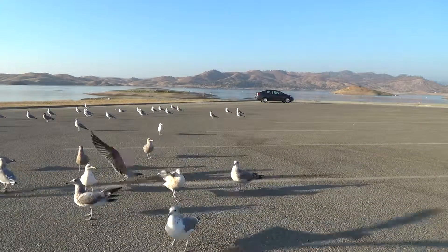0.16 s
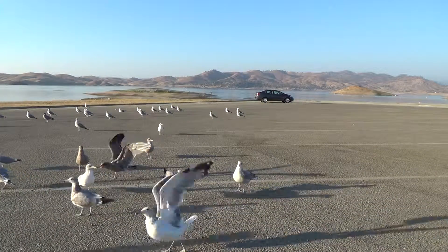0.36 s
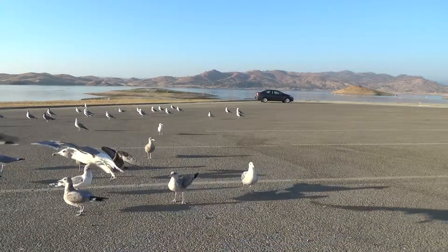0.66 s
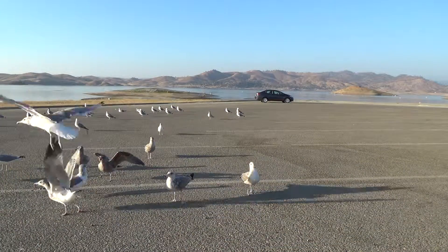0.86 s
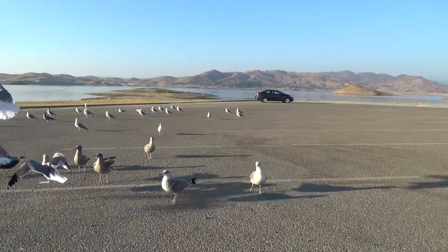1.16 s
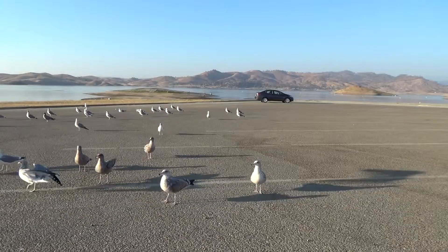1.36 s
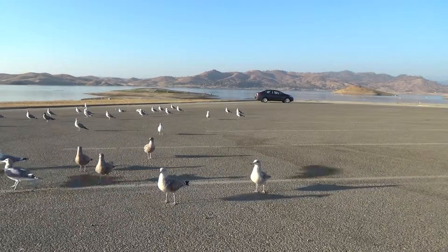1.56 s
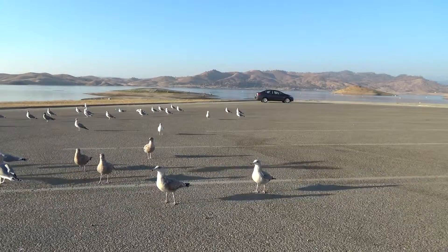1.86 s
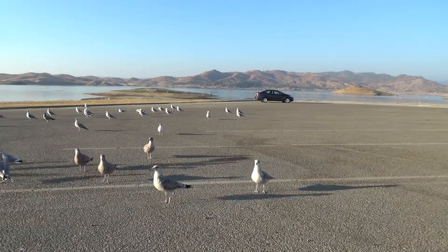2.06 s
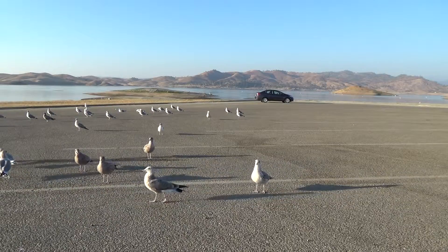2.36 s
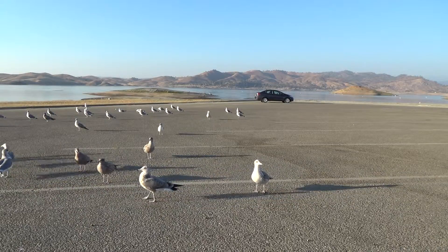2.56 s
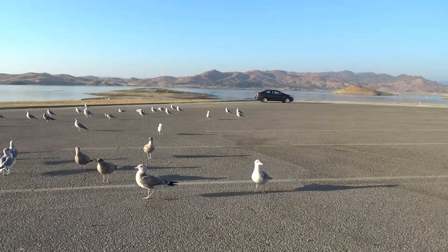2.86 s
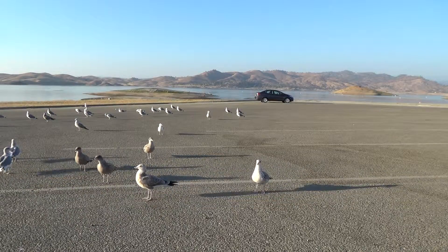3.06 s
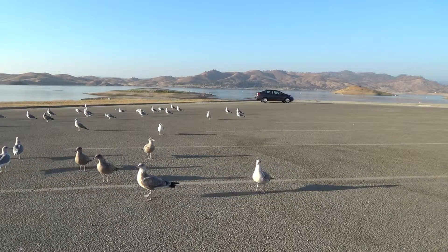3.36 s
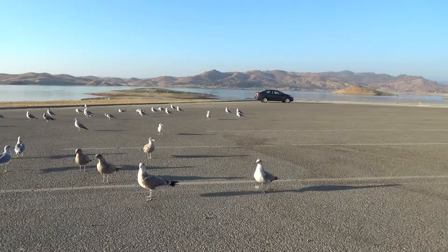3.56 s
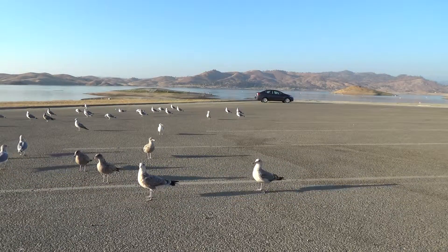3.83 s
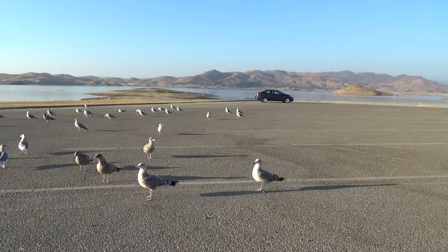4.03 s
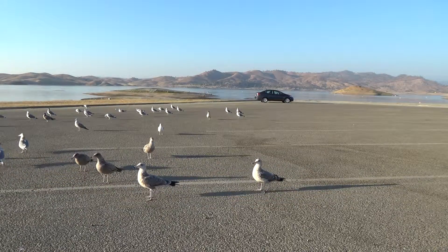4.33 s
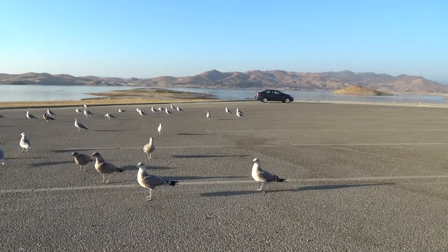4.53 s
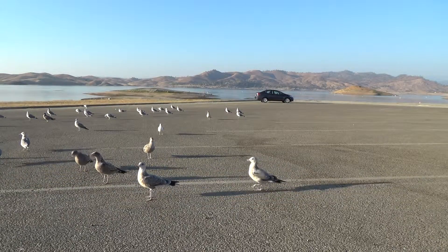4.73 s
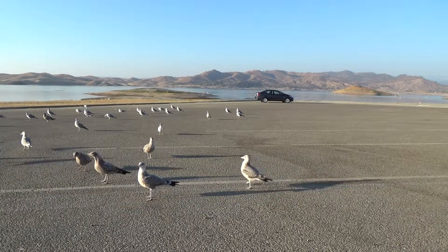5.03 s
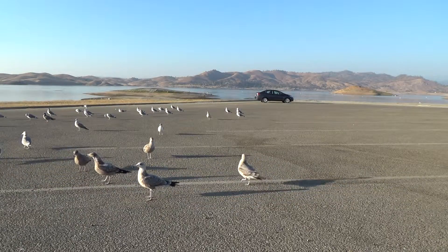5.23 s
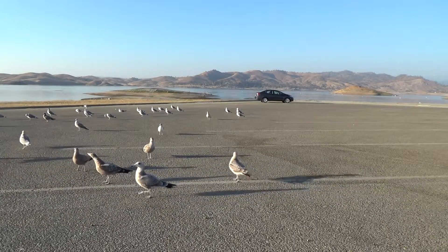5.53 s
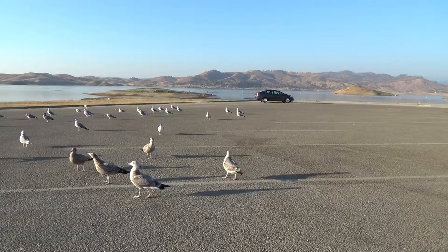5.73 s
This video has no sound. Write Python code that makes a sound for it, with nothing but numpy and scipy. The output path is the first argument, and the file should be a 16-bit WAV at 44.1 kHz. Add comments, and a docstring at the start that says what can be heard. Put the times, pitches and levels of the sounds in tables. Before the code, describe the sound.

Quiet outdoor air, a very thin high whine and the light rustle of a gull flock on asphalt run throughout. At about 0.3 s a nearby gull, slightly left, cries out: a raspy start, then shrill clashing whistles around 3 to 4 kHz, sinking and cracking into a throbbing rattle from 0.9 to 1.3 s. A lull follows, with tiny ticks and scuffs. The second cry starts near 2.2 s, rough and whistling, becomes a loud, harsh rattle from 2.5 to 3.2 s, then thins into wavering whistles until 3.9 s. A firm low thump lands at 3.5 s. The third cry begins around 4.2 s, weaker and squealing; scuffs cluster at 4.55 to 5.1 s while a second gull gives a brief falling yelp at 4.7 s. A fading, pulsing rattle runs from 5.2 to 5.8 s. Open, nearly echo-free stereo, with only a faint smear from the ground.

```python
"""Quiet outdoor air with a thin whine, the rustle of a flock on asphalt and short thumps and scuffs run throughout.
Gulls give three long cries, from about 0.3, 2.2 and 4.2 s; a second gull yelps at 4.7 s, falling in pitch.
Two membranes of the syrinx whistle at different pitches, and their shared air stream adds mixing tones.
Each cry breaks into a rattle: a train of pulses, often throbbing, each of which rings the throat.
The ground returns a faint smear, and the summed sound is softly limited and loses its top."""
import sys
import numpy as np
from scipy import signal
from scipy.fft import rfft, irfft, next_fast_len
from scipy.io import wavfile
from scipy.ndimage import uniform_filter1d

SR = 44100
rng = np.random.default_rng(int(sys.argv[2]) if len(sys.argv) > 2 else 0)


def file_out(sig):
    """Save sig as 16-bit WAV at sys.argv[1]."""
    # one column per channel
    cols = np.atleast_2d(sig).T
    # limit, then scale
    lim = np.clip(cols, -1, 1)
    pcm = np.round(lim * 32767).astype(np.int16)
    wavfile.write(sys.argv[1], SR, pcm)


N = 259749
TIME = np.arange(N) / SR  # seconds

# Spectrum of the open air. Each row: frequency in Hz, relative level in dB.
AIR_COLOUR = [(18, -68.5), (30, -25.5), (84, -7.5), (226, -2), (453, -4), (529, -6), (618, -7),
              (2770, -14.5), (3320, -18), (12400, -19), (14500, -28.5)]
# rms levels in dB, before the final limiting and filtering
AIR_DB, WHINE_DB = -55, -69.5
WHINE_HZ = 15734

# Course of the flock's rustle. Each row: time in seconds, level in dB before a common offset.
RUSTLE_LEVEL = [(0, -47), (.3, -52), (1.35, -51), (1.63, -61), (2.12, -63), (3.5, -43.5), (4.1, -50),
                (4.6, -41), (5.89, -47)]
# Spectrum of the rustle. Each row: frequency in Hz, relative level in dB.
RUSTLE_COLOUR = [(180, -40), (300, -10.5), (685, -4), (892, -6), (1110, -5), (2520, -15), (10100, -7),
                 (15500, -18)]

# Thumps and scuffs on the ground. Each row: start in seconds, level in dB, centre frequency in Hz,
# width in octaves, rise in seconds, decay in seconds.
SCUFFS = [(.262, -42.5, 930, 0.84, 0.0011, 0.018), (1.357, -34, 5900, 1.25, .0005, 0.0018),
          (1.443, -41, 9100, 0.79, 0.00059, 0.0034), (1.495, -52.5, 1300, 1.1, .01, 0.012),
          (1.921, -51.5, 4000, 4, .006, 0.037), (2.593, -29, 1000, 1.6, 0.0014, 0.023),
          (2.96, -37, 606, 0.72, 0.025, 0.045), (3.472, -35, 2786, 1.64, 0.00078, 0.011),
          (3.527, -26, 2200, 1.9, 0.00094, 0.0077), (3.53, -20.5, 510, 1.5, 0.0025, 0.022),
          (4.157, -37, 1403, 1, 0.0042, 0.028), (4.553, -26, 2150, 1.53, 0.0032, 0.019),
          (4.559, -29, 791, 1.67, 0.0065, 0.047), (4.655, -30.5, 1034, 0.5, .02, 0.033),
          (4.846, -31, 1505, 0.87, 0.0052, 0.022), (5.079, -32, 1499, 0.86, 0.011, .025)]

# Rattles, as trains of pulses. Each row: start and end in seconds, attack and release in seconds,
# first and last level in dB, first and last pulse rate in Hz, run-down share of the rate (0-1),
# first and last throat resonance in Hz, mid-way resonance rise in Hz, first and last ring in dB,
# throb period in seconds, throb depth in dB.
RATTLES = [ (.328, .362, .018, .006, -25, -21, 376, 390, 0, 3360, 3400, 0, -2, -3, .05, 0),
           (.384, .43, .02, .012, -27, -26, 440, 390, 0, 3700, 3550, 0, 8, 8, .05, 0),
           (.911, 1.321, .004, .014, -26, -22.5, 285, 212, .5, 2650, 2450, 0, 11.5, 8.5, .0502, 19),
           (2.152, 2.42, .045, .19, -25.5, -23, 248, 310, 0, 3400, 2950, 500, -12, 38, .05, 0),
           (2.529, 3.18, .012, .045, -18, -20, 298, 222, .2, 3620, 3100, -130, 8, -1, .048, 3),
           (3.91, 3.96, .01, .04, -24, -27, 210, 150, .1, 2414, 1760, 0, 27, 24, .05, 0),
           (5.222, 5.83, .03, .035, -25, -29.5, 308, 180, .04, 3440, 2940, 440, 17, 2, .0495, 5.5), ]
# Throat transmission while rattling, in three postures. Each row: frequency in Hz, relative level in dB.
THROAT_A = [(150, -33), (260, -19.5), (850, -22.5), (1200, -33.5), (1700, -8), (2650, -3), (3300, -1.5),
            (3900, -19.5), (5000, -5.5), (6400, -23), (7500, -16.5), (8700, -26.5), (10400, -12.5),
            (15000, -42)]
THROAT_B = [(150, -37.5), (260, -13.5), (1150, -15.5), (1600, -13), (2100, 2.5), (2800, 7.5), (3850, 6),
            (4700, -19.5), (5500, -11), (6700, -4.5), (7900, -20.5), (9700, -2.5), (11300, -19.5),
            (15500, -55)]
THROAT_C = [(150, -35), (260, -8), (1000, -9.5), (1600, -8), (2200, -0.5), (3000, 1), (3700, 4),
            (4500, -19.5), (5600, -12), (6500, -8), (7800, -20), (9600, -11), (11000, -16.5), (15500, -60)]
# The bill just opening, with a resonance near 1.3 kHz. Each row: frequency in Hz, relative level in dB.
THROAT_OPENING = [(150, -34), (260, -15.5), (1000, -16), (1300, -7.5), (1700, -16.5), (2200, -8),
                  (2800, 1.5), (3750, 5), (4800, -24), (6200, -14.5), (8000, -31.5), (10000, -12),
                  (15000, -44)]
# the pulses run down as the breath gives out; a wider gape raises throat resonance and level together
RUN_DOWN_S, GAPE_DB_PER_HZ = .03, .012
# over one throb the pulses quicken and the throat rises by these shares; throbbing dies away late
THROB_QUICKENS, THROB_LIFTS, THROB_DYING_POWER = .12, .13, 6

# Notes of the lower membrane. Each row: start and end in seconds, first and last pitch in Hz,
# first and last level in dB, octave level in dB, treble in dB relative to the note, roughness (0-1).
LOW_NOTES = [ (.334, .357, 3480, 3480, -38, -26, -29, 3, .7),
             (.357, .412, 3290, 3030, -26, -30, -13.5, 1, .08),
             (.412, .635, 2960, 3030, -29, -40, -29, -6, .26),
             (.638, .695, 3110, 3020, -15, -17, -29, -14, .15),
             (.695, .875, 2960, 2760, -27, -27, -27, -5, .22),
             (2.3, 2.535, 2540, 2570, -32, -36, -68, -8, .22),
             (3.17, 3.328, 2570, 2485, -35, -29, -39, -14, .2),
             (3.334, 3.637, 2466, 2476, -25.5, -27, -26, -19, .05),
             (3.637, 3.9, 2440, 2480, -41, -33, -42, -18, .2),
             (4.192, 4.265, 2290, 2410, -28, -29, -36, -10, .08),
             (4.265, 4.6, 2380, 2460, -37, -39, -42, -16, .35),
             (4.797, 4.932, 2510, 2505, -24, -28, -50, -20, .03),
             (4.93, 5.1, 2490, 2420, -43, -35, -44, -12, .35),
             (5.1, 5.245, 2240, 2520, -34, -31, -36, -14, .3), ]
# Notes of the upper membrane. Each row: start and end in seconds, first and last pitch in Hz,
# first and last level in dB, octave level in dB, treble in dB relative to the note, roughness (0-1).
HIGH_NOTES = [ (.39, .692, 3830, 3730, -37, -25, -42, -2, .36),
              (.692, .825, 3780, 3460, -17, -21, -29, -8, .2),
              (2.283, 2.512, 3280, 3265, -23, -16, -34, -7, .1),
              (3.17, 3.637, 3430, 3270, -38, -66, -57, -12, .2),
              (3.637, 3.895, 3180, 3320, -42, -41, -51, -12, .18),
              (4.255, 4.83, 3250, 3232, -47, -39, -43, -12, .26),
              (4.93, 5.25, 3310, 3190, -33, -31.5, -43, -12, .33), ]
# every note starts a little sharp (as a share of pitch), settles, and swells towards its middle
NOTE_EDGE_S, ONSET_SHARP, SETTLE_S, NOTE_SWELL_DB = .01, .015, .02, 1.2
# Mixing tones at m * low + n * high. Each row: multiple m, multiple n.
MIXES = [(2, -1), (-1, 2), (1, 1), (-1, 3)]
# Median levels of those mixing tones. Each entry: level in dB relative to the geometric mean of the notes.
MIXES_DB = [-13.5, -15.5, -16.5, -23]
# Overtones of the joint air stream. Each row: multiple of its phase, relative level in dB.
OVERTONES = [(3, -6), (4, -18), (5, -16.5)]
# Spectrum of air hissing through the bill. Each row: frequency in Hz, relative level in dB.
HISS_COLOUR = [(200, -16.5), (700, -8), (1400, -11), (2300, 7), (4200, 2), (5200, -3), (6600, 4),
               (8000, -1), (10000, 10.5), (12000, 1.5), (15000, -25.5)]

# Squeaks where the voice flips between registers. Each row: centre in seconds, pitch in Hz, level in dB,
# half length in seconds, relative fall per second, octave level in dB relative to the fundamental.
SQUEAKS = [(.622, 2500, -28, .011, .8, -1), (.836, 2790, -17, .014, .6, -4),
           (0.89, 2717, -13, 0.01, .8, -8.5), (0.943, 2760, -21.5, 0.0083, .8, -12),
           (0.996, 2726, -11.5, 0.0044, .8, -12), (1.046, 2853, -21, 0.0077, .8, -12.5),
           (1.099, 2720, -15.5, 0.0045, .8, -9.5), (2.522, 2610, -12, .015, 1.4, -21),
           (3.302, 2486, -33, .012, .2, 6), (3.768, 2472, -28, .018, .1, -3),
           (3.902, 2447, -22, 0.0094, 3.2, -6.5), (4.84, 2226, -25, 0.0055, 5, -6.5),
           (5.383, 2410, -27, .017, .5, -2)]

# Faint low tones under the whistles: half-pitch tones, a mixing tone near 1.65 kHz, or a far gull.
# Each row: start and end in seconds, first and last pitch in Hz, median level in dB.
UNDERTONES = [(2.975, 3.14, 840, 900, -43), (4.2, 4.26, 1186, 1165, -42), (4.928, 5.075, 1665, 1615, -36.5),
              (5.14, 5.175, 1210, 1240, -38)]

# A second gull's falling yelp. Each row: time in seconds, pitch in Hz, gain in dB common to its partials.
YELP = [(4.696, 929, -18.5), (4.712, 920.8, -19), (4.79, 867, -25), (4.804, 842, -34), (4.86, 741.8, -52)]
# Partials of the yelp. Each row: multiple of the pitch, relative level in dB.
YELP_HARMONICS = [(1, -26.5), (2, -18), (3, -12.5), (4, 1.5), (5, -15), (6, -23.5), (7, -32), (8, -27),
                  (9, -32), (12, -29), (13, -25)]


def from_db(db):
    """The decibel law: amplitude is ten to the power dB / 20."""
    return 10 ** (np.asarray(db) / 20)


def rms_one(x):
    """Power normalization: scale a signal to unit rms."""
    return x / np.sqrt(np.mean(x ** 2) + 1e-20)


def in_time(rows, at=TIME):
    """Linear interpolation: each column of a curve, read at the given times."""
    s, *columns = np.transpose(rows)
    return [np.interp(at, s, c) for c in columns]


def at_hz(points, hz):
    """Interpolation on a log-frequency axis: a spectrum in dB at the given frequencies."""
    f, db = np.transpose(points)
    return np.interp(np.log(hz + 1), np.log(f), db)


def glide(first, last, progress):
    """Linear motion from one value to another."""
    return first + (last - first) * progress


def arch(progress):
    """A parabola: zero at both ends, one in the middle."""
    return 4 * progress * (1 - progress)


def gate(start, end, edge):
    """Windowing: the samples a sound covers, its progress from 0 to 1, and a soft-edged window."""
    near = np.flatnonzero((TIME > start - edge / 2) & (TIME < end + edge / 2))
    t = TIME[near]
    progress = np.clip((t - start) / (end - start), 0, 1)
    window = np.clip(np.minimum(t - start, end - t) / edge + .5, 0, 1)
    return near, progress, window


def noise(colour):
    """Spectral shaping: white noise filtered to the given spectrum, at unit rms."""
    size = next_fast_len(N)
    hz = np.arange(size // 2 + 1) * SR / size
    spectrum = rfft(rng.standard_normal(size)) * from_db(at_hz(colour, hz))
    return rms_one(irfft(spectrum, size)[:N])


def waver(hz):
    """Low-pass noise: random motion up to about this rate, at unit rms."""
    low_pass = signal.butter(2, min(hz, SR / 4), fs=SR, output="sos")
    return rms_one(signal.sosfilt(low_pass, rng.standard_normal(N)))


def outdoors(side_db=-12):
    """Interaural coherence: air noise alike at both ears in the bass, plus a thin electronic whine."""
    treble_only = signal.butter(1, 400, "high", fs=SR, output="sos")
    side = signal.sosfilt(treble_only, noise(AIR_COLOUR))
    air = from_db(AIR_DB) * (noise(AIR_COLOUR) + from_db(side_db) * side * [[1], [-1]])
    whine = np.sqrt(2) * from_db(WHINE_DB) * np.sin(2 * np.pi * WHINE_HZ * TIME)
    return air + whine


def rustle(rustle_db=-2, grain_db=3):
    """Amplitude modulation: fine random grain on noise for the wings and feet of the flock."""
    db, = in_time(RUSTLE_LEVEL)
    grains = rms_one(noise(RUSTLE_COLOUR) * from_db(grain_db * waver(150)))
    return from_db(db + rustle_db) * grains


def scuffs(size=16384):
    """Impact and friction: band-limited noise bursts with a linear rise and exponential decay."""
    out, t = np.zeros(N + size), np.arange(size) / SR
    hz = np.arange(1, size // 2 + 2) * SR / size
    for s, db, centre, octaves, rise, decay in SCUFFS:
        band = 1 / (1 + (np.log2(hz / centre) / octaves) ** 4)
        burst = rms_one(irfft(rfft(rng.standard_normal(size)) * band))
        envelope = np.minimum(t / rise, 1) * np.exp(-np.maximum(t - rise, 0) / decay)
        i = round(s * SR)
        out[i:i + size] += from_db(db) * burst * envelope
    return out[:N]


def rattle(row, throat, follow=0.74, ring_hz=230, bright_db=7, jitter=.014, uneven_db=1.4,
           narrowing_db=9, size=512):
    """Source and filter: membranes slap shut, and every slap excites the throat's resonances."""
    (start, end, attack, release, first_db, last_db, first_rate, last_rate, run_down,
     first_hz, last_hz, rise_hz, first_ring_db, last_ring_db, throb_s, throb_db) = row
    t = np.arange(0, end - start, 1 / SR)
    progress, left = t / (end - start), end - start - t
    # position within a throb, from -0.5 to 0.5; zero when the rattle does not throb
    throbbing = np.clip(throb_db, 0, 1) * (1 - progress ** THROB_DYING_POWER)
    within = (t / throb_s % 1 - .5) * throbbing
    per_s = glide(first_rate, last_rate, progress) * (1 - run_down * np.exp(-left / RUN_DOWN_S))
    per_s *= 1 + THROB_QUICKENS * within + jitter * waver(200)[:len(t)]

    # one slap for each whole cycle of the rate; from here on, one value per slap
    at = np.flatnonzero(np.diff(np.floor(np.cumsum(per_s) / SR + .5)))
    t, progress, left, within, per_s = t[at], progress[at], left[at], within[at], per_s[at]
    throb, gape_hz = (t / throb_s).astype(int), rise_hz * arch(progress)
    centre = glide(first_hz, last_hz, progress) + gape_hz
    ring_db = glide(first_ring_db, last_ring_db, progress)
    # within a throb the slaps fade
    level_db = glide(first_db, last_db, progress) + GAPE_DB_PER_HZ * gape_hz - throb_db * within
    chance = rng.standard_normal((size, size))
    gains = from_db(level_db + uneven_db * chance[:len(at), -1])
    gains *= np.minimum(t / attack, 1) * np.minimum(left / release, 1)

    # the resonances slide together; the spectrum varies by slap and by throb, most of all in the treble
    stretch = (centre / np.median(centre)) ** follow * (1 + THROB_LIFTS * within)
    stretch *= 1 + .012 * chance[:len(at), -2]
    hz = np.arange(size // 2 + 1) * SR / size
    ripples = 2 * uniform_filter1d(chance[:, :len(hz)], size=4, axis=1)
    grit = ripples[:len(at)] + ripples[-1 - throb]
    upper = np.clip((hz - 3800) / 1500, 0, 1)
    # within a throb the treble dulls while the main resonance strengthens
    colour_db = at_hz(throat, hz / stretch[:, None]) + (1 + upper) * grit
    colour_db -= upper * bright_db * within[:, None]
    resonance = 1 / (1 + ((hz - centre[:, None]) / ring_hz) ** 2)
    colour_db += (ring_db + narrowing_db * within)[:, None] * resonance

    # minimum phase by the folded cepstrum: a sharp start, then the ring
    cepstrum = irfft(np.log(from_db(colour_db)), axis=1)
    cepstrum[:, 1:size // 2] *= 2
    cepstrum[:, size // 2 + 1:] = 0
    slaps = irfft(np.exp(rfft(cepstrum, axis=1)), axis=1)
    out = np.zeros(N + SR)
    for i, slap, gain, rate in zip(at + round(start * SR), slaps, gains, per_s):
        # equal power whatever the pulse rate
        out[i:i + size] += rms_one(slap) * np.sqrt(SR / rate / size) * gain
    return out[:N]


def rattles():
    """Pulsed phonation: seven rattles, each filtered by one of four throat postures."""
    throats = [THROAT_B, THROAT_C, THROAT_A, THROAT_OPENING, THROAT_B, THROAT_A, THROAT_C]
    return sum(rattle(row, throat) for row, throat in zip(RATTLES, throats))


def whistle(notes, jitter=.004, wander=.004, flutter_db=1.5, rasp_hz=400):
    """Self-sustained oscillation: one membrane's phase, note and octave levels, treble and hiss drives."""
    hz, sounding, strength, octave, treble, rough = np.zeros((6, N))
    for start, end, first_hz, last_hz, first_db, last_db, octave_db, treble_db, roughness in notes:
        near, progress, window = gate(start, end, NOTE_EDGE_S)
        sharp = 1 + ONSET_SHARP * np.exp(-progress * (end - start) / SETTLE_S)
        envelope = window * from_db(NOTE_SWELL_DB * (arch(progress) - .5))
        level = envelope * from_db(glide(first_db, last_db, progress))
        sounding[near] += window
        hz[near] += window * sharp * glide(first_hz, last_hz, progress)
        rough[near] += window * roughness
        strength[near] += level
        octave[near] += envelope * from_db(octave_db)
        treble[near] += level * from_db(treble_db)
    hz /= np.maximum(sounding, 1e-9)  # overlapping notes share the pitch
    unsteady_hz = hz * (1 + jitter * waver(70) + wander * waver(12))
    phase = 2 * np.pi * np.cumsum(unsteady_hz) / SR + .5 * rough * waver(rasp_hz)
    swell = np.sqrt(2) * from_db(flutter_db * waver(39)) * (1 + 1.2 * rough * waver(rasp_hz))
    # less hiss where the voice is smooth
    breathy = np.clip(3 * rough, .2, 1)
    return phase, swell * strength, swell * octave, treble, treble * breathy


def squeals(overtone_db=-1, hiss_db=-3, flicker_db=4):
    """Intermodulation: two membranes share one air stream, so sum and difference tones join them."""
    low = whistle(LOW_NOTES, jitter=0.0046, flutter_db=2.0)
    high = whistle(HIGH_NOTES, jitter=0.0037, flutter_db=2.34)
    out, stream, power, treble, breath = 0, 0, 1e-12, 0, 0
    for phase, strength, octave, overtone_drive, hiss_drive in (low, high):
        out = out + strength * np.sin(phase) + octave * np.sin(2 * phase)
        stream = stream + np.hypot(strength, octave) * np.exp(1j * phase)
        power = power + strength ** 2 + octave ** 2
        treble = np.hypot(treble, overtone_drive)
        breath = np.hypot(breath, hiss_drive)
    coupling = np.sqrt(np.abs(low[1] * high[1]))
    for (m, n), db in zip(MIXES, MIXES_DB):
        flickering = coupling * from_db(db + flicker_db * waver(30))
        out = out + flickering * np.sin(m * low[0] + n * high[0])
    # the overdriven stream makes clusters of lines in the treble; hiss pulses with it
    beat = np.abs(stream) / np.sqrt(power)
    overtones = sum(from_db(db) * np.sin(round(k) * np.angle(stream)) for k, db in OVERTONES)
    treble_only = signal.butter(4, 6500, "high", fs=SR, output="sos")
    clusters = signal.sosfilt(treble_only, np.sqrt(2) * beat ** 2 * overtones)
    hiss = beat * noise(HISS_COLOUR)
    out = out + treble * from_db(overtone_db) * clusters + breath * from_db(hiss_db) * hiss
    return signal.sosfilt(signal.butter(2, 900, "high", fs=SR, output="sos"), out)


def squeaks(third_db=-8, rough=0.08):
    """Frequency glide: brief sinking whistles with a second and third harmonic."""
    out, shake = np.zeros(N), rough * waver(600)
    for s, hz, db, half, fall_per_s, octave_db in SQUEAKS:
        near = np.abs(TIME - s) < 4 * half
        t = TIME[near] - s
        phase = 2 * np.pi * hz * (t - fall_per_s * t * t / 2) + shake[near]
        upper = np.sin(2 * phase) + from_db(third_db) * np.sin(3 * phase)
        envelope = np.sqrt(2) * from_db(db) * np.exp(-np.abs(t / half) ** 3)
        out[near] += envelope * (np.sin(phase) + from_db(octave_db) * upper)
    return out


def undertones(rough=0.26, edge=.017, flutter_db=3):
    """Frequency and amplitude modulation: faint gliding low tones under the whistles, unsteady in level."""
    out, shake = np.zeros(N), rough * waver(280)
    for start, end, first_hz, last_hz, db in UNDERTONES:
        near, progress, window = gate(start, end, edge)
        phase = 2 * np.pi * np.cumsum(glide(first_hz, last_hz, progress)) / SR + shake[near]
        level = from_db(db + flutter_db * waver(30)[near])
        out[near] += np.sqrt(2) * window * level * np.sin(phase)
    return out


def yelp(jitter=0.0049, rise=0.034):
    """Harmonic series: a call whose fourth partial, on the throat resonance, is the strongest."""
    out = np.zeros(N)
    near, _, window = gate(YELP[0][0], YELP[-1][0], rise)
    hz, db = in_time(YELP, TIME[near])
    phase = 2 * np.pi * np.cumsum(hz * (1 + jitter * waver(500)[near])) / SR
    partials = sum(from_db(g) * np.sin(round(k) * phase) for k, g in YELP_HARMONICS)
    out[near] = np.sqrt(2) * window * from_db(db) * partials
    return out


def scatter(x, wet_db=-24, decay=.006, size=4096):
    """Diffuse reflection: rough ground returns a faint, short smear, different at each ear."""
    t = np.arange(size) / SR
    echoes = rng.standard_normal((2, size)) * np.exp(-t / decay) * (t > .001)
    echoes /= np.sqrt(np.sum(echoes ** 2, axis=1, keepdims=True))
    return from_db(wet_db) * signal.fftconvolve(x[None], echoes, axes=1)[:, :N]


def panned(x, left_db):
    """Interaural level difference: place a source by how much louder it is on the left."""
    return x * from_db([[left_db / 2], [-left_db / 2]])


def scene():
    """Superposition: callers a little to the left, thumps slightly right, rustle near the middle."""
    gulls = squeals() + squeaks() + yelp() + undertones() + rattles()
    ground = scuffs()
    direct = panned(gulls, left_db=2.4) + panned(ground, left_db=-1.5) + panned(rustle(), left_db=.8)
    around = scatter(gulls, wet_db=-18) + scatter(ground, wet_db=-10)
    high_pass = signal.butter(2, 110, "high", fs=SR, output="sos")
    return signal.sosfilt(high_pass, direct + around) + outdoors()


def record(dry):
    """Saturation and band limits: peaks are rounded, the microphone dulls the top, and the top is cut."""
    rounded = dry / (1 + np.abs(dry / .6) ** 8) ** (1 / 8)
    dulled = signal.sosfilt(signal.butter(2, 14000, fs=SR, output="sos"), rounded)
    steep_cut = signal.ellip(10, .1, 80, 15900, fs=SR, output="sos")
    return signal.sosfilt(steep_cut, dulled)


dry = scene()
out = record(dry)
file_out(out)
```